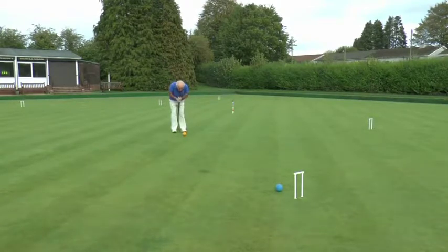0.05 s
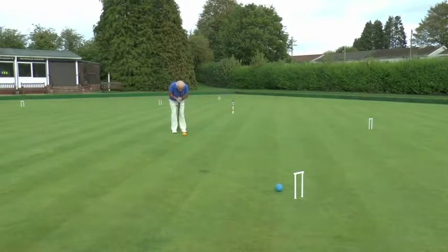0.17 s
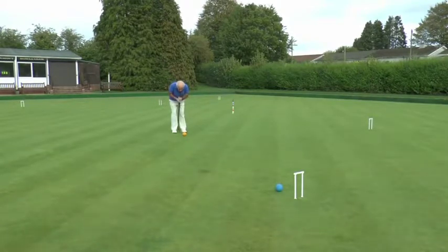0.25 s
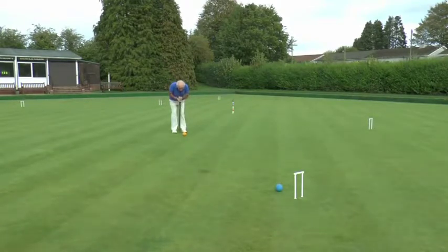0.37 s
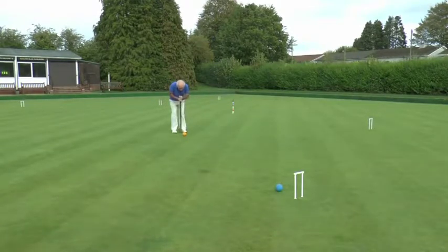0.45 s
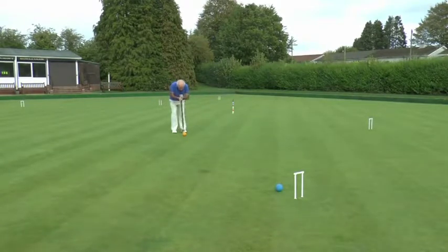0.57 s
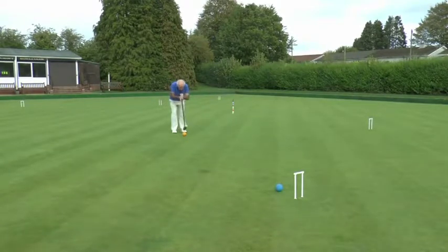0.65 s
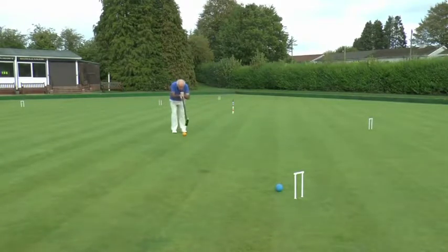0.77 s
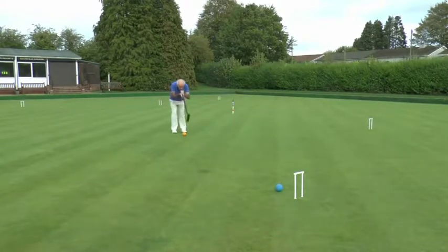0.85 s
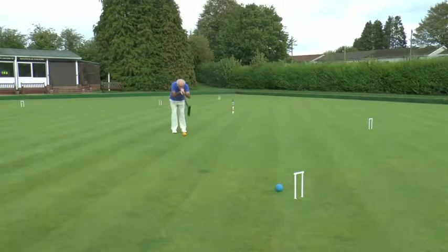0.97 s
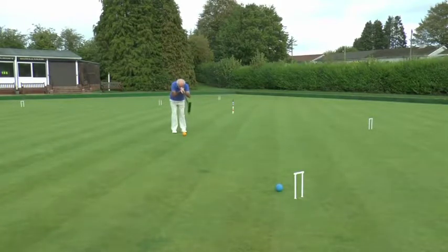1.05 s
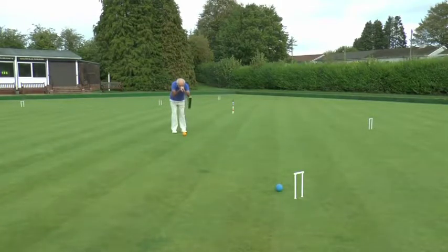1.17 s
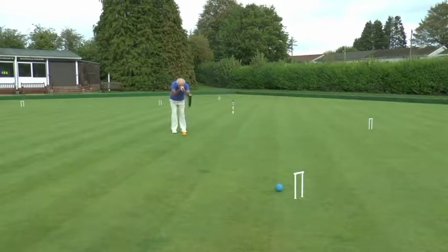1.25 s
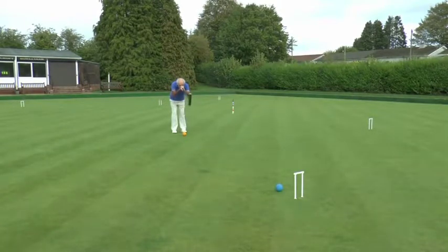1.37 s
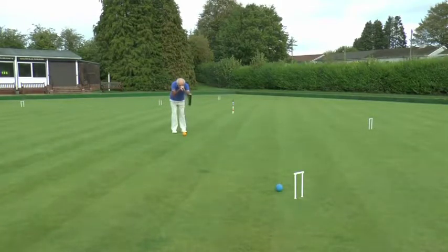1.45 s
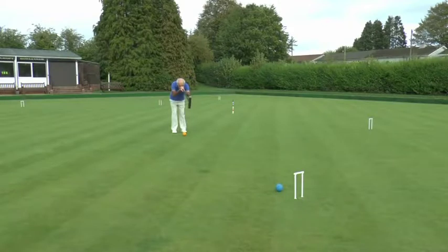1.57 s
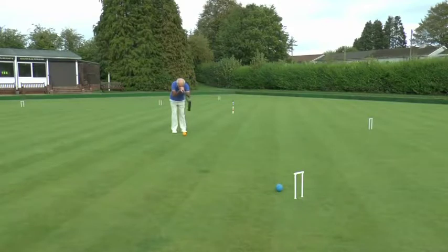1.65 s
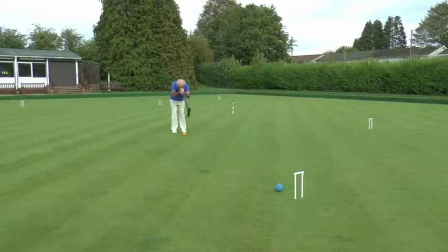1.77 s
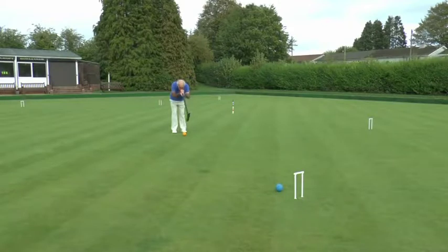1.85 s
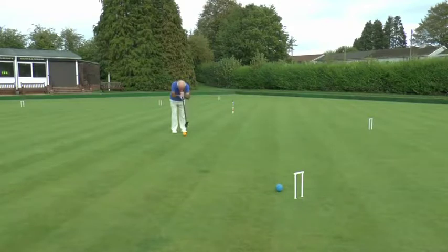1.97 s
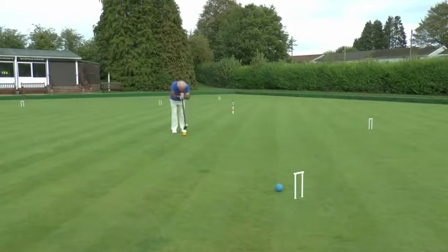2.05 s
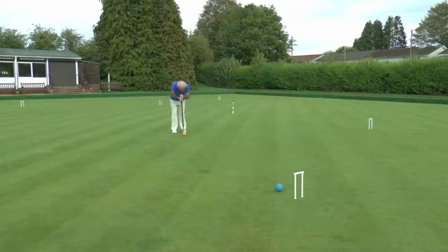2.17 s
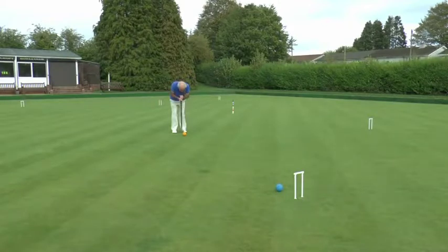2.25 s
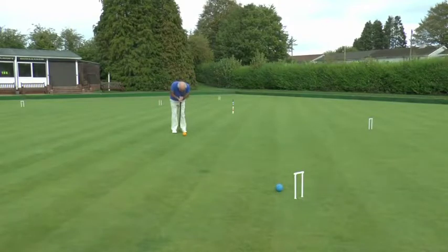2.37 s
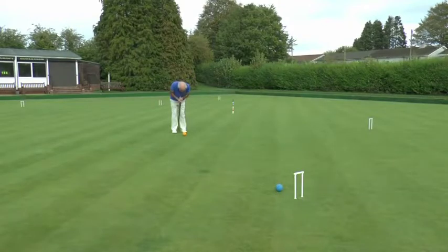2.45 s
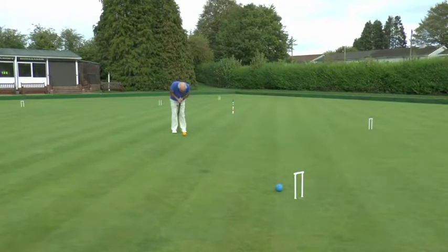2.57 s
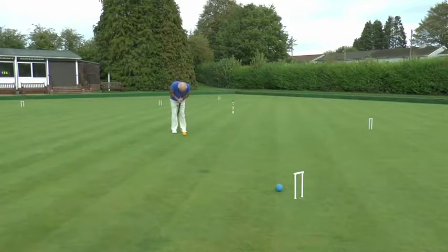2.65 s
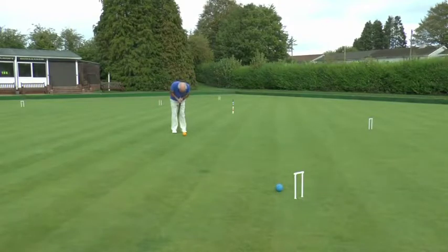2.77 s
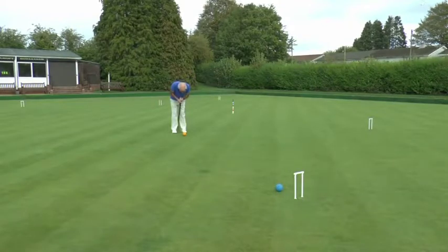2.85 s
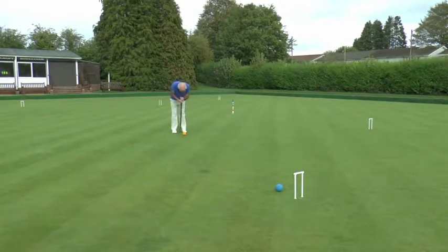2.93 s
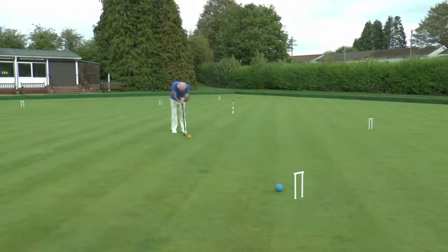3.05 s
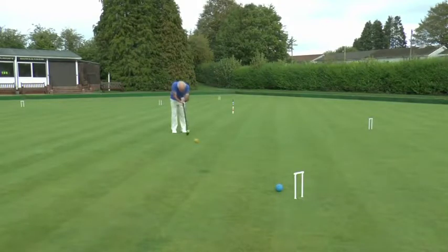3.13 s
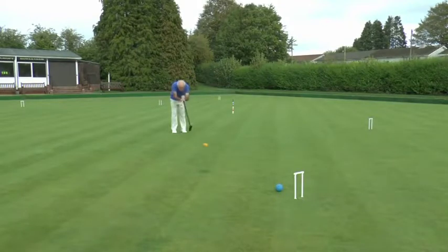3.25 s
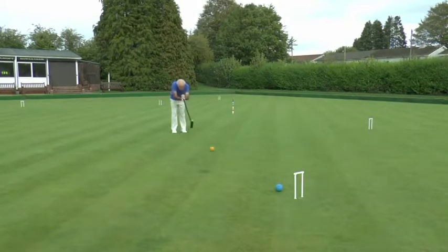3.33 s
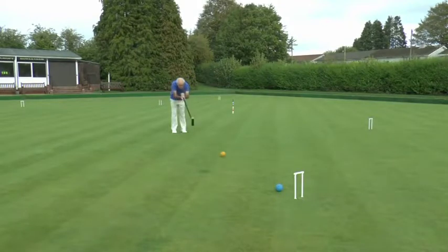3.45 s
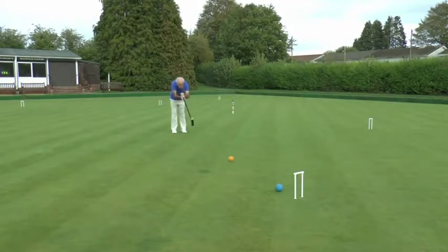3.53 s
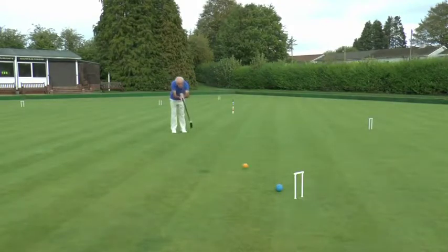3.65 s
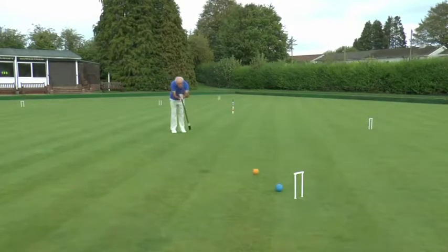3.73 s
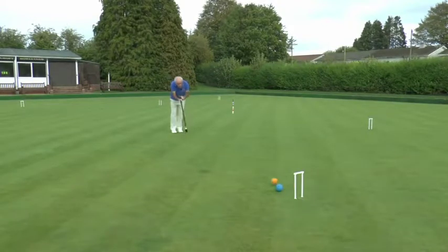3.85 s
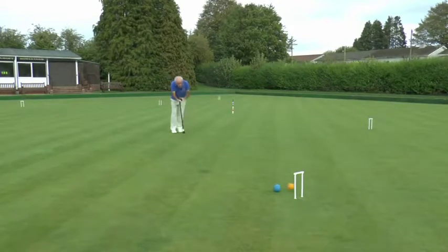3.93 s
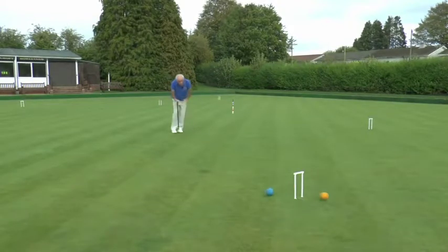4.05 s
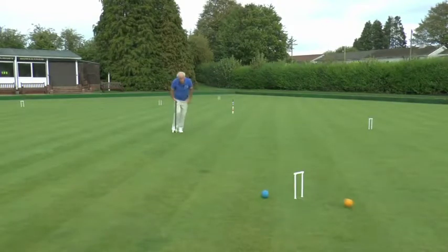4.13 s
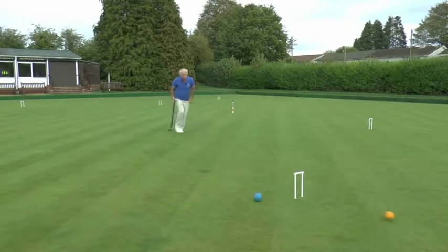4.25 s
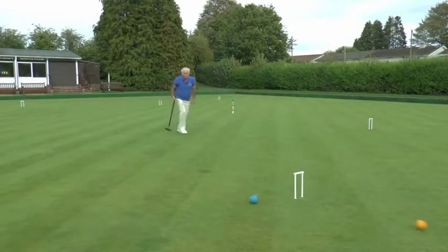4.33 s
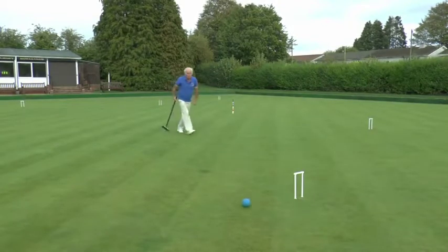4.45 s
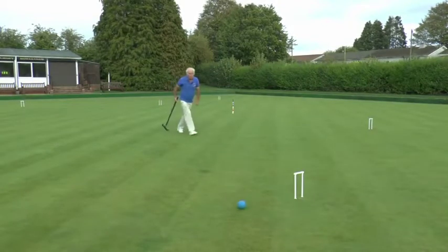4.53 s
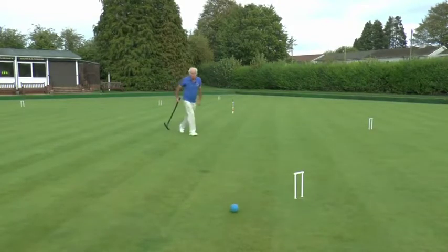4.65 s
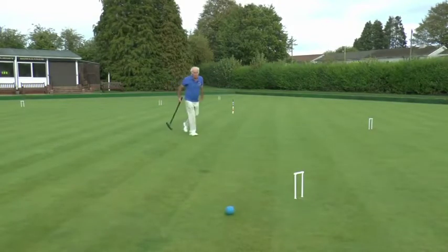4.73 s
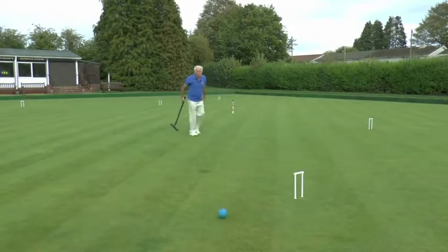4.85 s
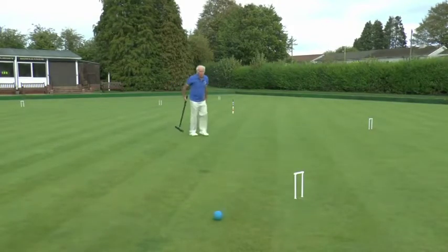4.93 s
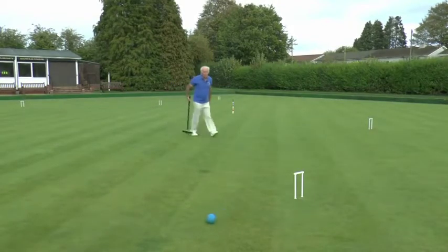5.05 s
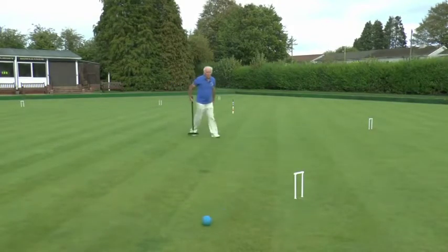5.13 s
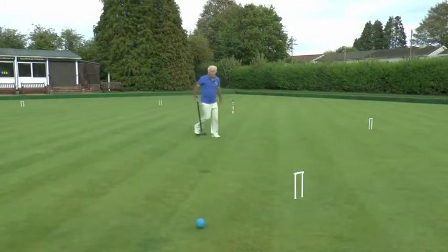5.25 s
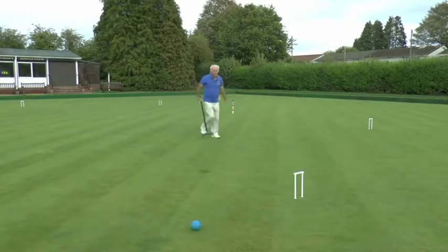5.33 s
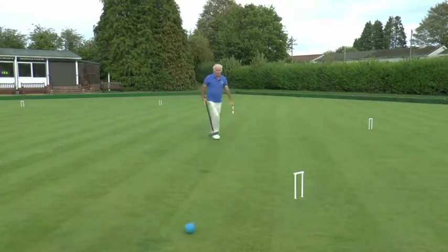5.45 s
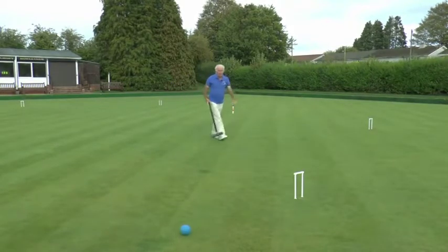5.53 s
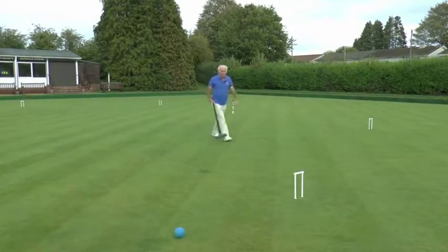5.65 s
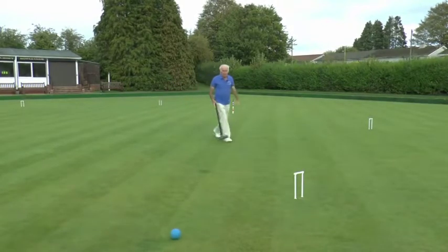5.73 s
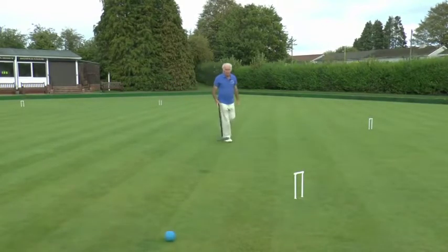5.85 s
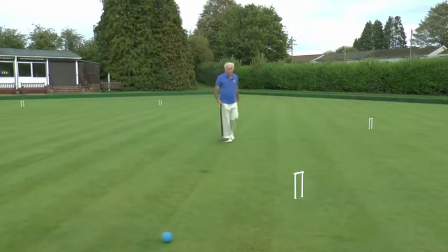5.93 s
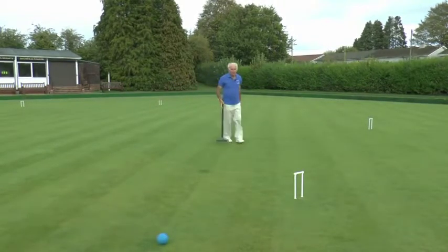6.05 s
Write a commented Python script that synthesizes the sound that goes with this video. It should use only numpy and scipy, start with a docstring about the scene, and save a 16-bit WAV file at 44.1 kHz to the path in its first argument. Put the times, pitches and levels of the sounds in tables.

```python
"""A wooden mallet clacks on a croquet ball on an open lawn: damped modes under a rough noise crack.
Hedges and a pavilion return faint echoes as smeared noise bands; the ball knocks a second ball, falling in pitch.
Wind thumps the microphone ever harder as lumpy noise, over noise bands of far traffic and rustling trees.
Small ticks ring nearby; the signal crackles with spikes and grainy noise in the gusts and drops out once."""
import sys
import numpy as np
from scipy import signal
from scipy.fft import rfft, irfft
from scipy.io import wavfile
from scipy.ndimage import uniform_filter1d

SR = 44100
rng = np.random.default_rng(int(sys.argv[2]) if len(sys.argv) > 2 else 0)


def bounce(signal):
    """Save signal as a 16-bit WAV file at the path given by the first command-line argument."""
    frames = np.transpose(np.atleast_2d(signal))
    limited = np.clip(frames, -1, 1)
    pcm = np.round(limited * 32767).astype(np.int16)
    wavfile.write(sys.argv[1], SR, pcm)


N = 268965
T = np.arange(N) / SR

# surroundings: (time [s], leaves level [dB], traffic level [dB])
RUSTLE = [(0.0, -65.5, -58.5), (0.32, -69, -59), (0.78, -67.5, -58), (1.54, -70, -58.5), (2.63, -64, -57.5),
          (3.11, -64.5, -58), (3.24, -67, -57.5), (3.6, -68, -59), (4.14, -67, -57.5), (4.67, -69.5, -58),
          (5.25, -70, -59.5), (5.74, -70, -59.5), (5.89, -71.5, -61.5), (6.1, -70, -60)]
# noise spectra, relative: (frequency [Hz], density [dB per Hz])
TRAFFIC_SPECTRUM = [(20, 4), (40, 4), (80, -15.5), (150, 3), (300, -2.5), (500, -1), (760, 0), (1050, -2),
                    (1400, -10.5), (2000, -18), (3000, -46), (5000, -57)]
LEAVES_SPECTRUM = [(900, -31.5), (1500, -1.5), (2400, 0), (3300, -2), (4200, -3.5), (5200, -7),
                   (6500, -13.5), (8000, -29.5), (11000, -53)]
HISS_SPECTRUM = [(3000, -27), (5000, 0), (7000, 1), (9500, -1), (11100, -2), (11600, -19), (12000, -71)]
SIDE_HISS_SPECTRUM = [(200, 2), (500, -7.5), (1200, -7.5), (2200, -3), (5000, -3), (11100, -5),
                      (11600, -42), (12000, -70)]
SIDE_HISS_DB = -81.5
HISS_DB, HISS_FOLLOWS = -74.5, 0.8  # mean level; share of the leaves' dB changes
# fuzzy whistles and noise bands: (start [s], end [s], from [Hz], to [Hz], width [Hz], level [dB])
WHISTLES = [(2.334, 3.2, 4000, 4400, 440, -74.5), (3.749, 3.906, 4800, 4800, 1500, -69.5),
            (4.166, 4.32, 1690, 1370, 50, -74), (3.95, 5.88, 1300, 1480, 660, -70)]

# wind at the microphone: (time [s], slow eddies [dB], small fast eddies [dB])
WIND = [(0.0, -67.5, -77), (0.38, -69, -67), (0.46, -45.5, -59), (0.62, -59.5, -62), (0.72, -61.5, -65),
        (0.95, -54.5, -60), (1.3, -52, -56.5), (1.56, -62.5, -64.5), (1.64, -41, -53), (1.9, -46, -59),
        (2.12, -55.5, -64), (2.5, -45.5, -57.5), (3.28, -49.5, -59), (3.55, -36.5, -47), (3.73, -23, -36),
        (3.85, -36, -47), (4.03, -46, -62), (4.2, -36, -46.5), (4.35, -36.5, -48.5), (4.55, -32, -45.5),
        (4.7, -33.5, -37), (4.82, -26, -34), (4.99, -32.5, -41), (5.05, -27.5, -31.5), (5.25, -26, -37),
        (5.38, -20, -29), (5.49, -24, -31), (5.56, -24, -22.5), (5.72, -22, -24), (5.84, -25, -30),
        (5.92, -28.5, -26), (6.0, -26.5, -40.5), (6.1, -36, -48)]
# single strong thumps in the wind: (centre [s], level [dB])
THUMPS = [(0.428, -46), (0.499, -30), (0.558, -29), (0.784, -31), (0.819, -40), (0.906, -41), (1.128, -48),
          (1.364, -43), (1.509, -50.5), (1.811, -39.5), (2.187, -35), (2.464, -38), (2.6, -45),
          (2.807, -42), (2.939, -39.5), (3.062, -33), (3.178, -36), (3.226, -39.5), (3.343, -35.5),
          (3.425, -30), (3.575, -27.5), (3.63, -22.5), (3.67, -22.5), (3.877, -28.5), (3.924, -34.5),
          (4.127, -29), (4.186, -24.5), (4.45, -24.5), (4.503, -25), (4.573, -21.5), (4.795, -21),
          (4.965, -30.5), (5.655, -17.5), (5.705, -16), (5.819, -19)]
THUMP_HALF_WIDTH_S, THUMP_FAST_DB = 0.01, -16  # small eddies relative to the thump
# wind spectra, relative; the roar is for the strongest gusts: (frequency [Hz], density [dB per Hz])
SLOW_SPECTRUM = [(10, -3.5), (25, 1), (60, 1), (90, -9.5), (130, -40), (200, -87)]
FAST_SPECTRUM = [(50, -11.5), (90, 2), (150, -7), (230, -17), (330, -26), (600, -50.5), (1000, -76),
                 (2000, -77)]
ROAR_SPECTRUM = [(150, -16), (280, 6.5), (400, -4.5), (600, -9), (850, -20.5), (1300, -55)]

# spikes before shaping by the crackle tone: (time [s], level [dB], sign)
SPIKES = [(4.693, -34, -1), (4.698, -21, 1), (4.708, -41, 1), (4.709, -19.5, 1), (4.7742, -24, 1),
          (5.679, -27.5, -1), (5.702, -26, 1), (5.924, -26.5, 1)]
# grainy patches before shaping; a row that ends before it starts is silent: (start [s], end [s], level [dB])
CRACKLE = [(4.659, 4.701, -59), (4.684, 4.712, -54), (4.711, 4.7102, -46), (4.766, 4.807, -61.5),
           (4.964, 5.046, -66), (5.24, 5.29, -65), (5.664, 5.716, -55), (5.682, 5.689, -41.5),
           (5.888, 5.946, -61.5)]
# crackle tone: (frequency [Hz], gain [dB])
CRACKLE_TONE = [(300, -1), (1000, 2.5), (3000, -1), (6000, -7), (11500, -9.5), (12800, -16), (13500, -46)]
DROPOUT_START_S, DROPOUT_END_S, DROPOUT_DB = 4.7105, 4.7735, -28
RESIDUE_DB, RESIDUE_PER_S = -83, 300  # faint ticks left inside the dropout
EDGE_HZ = 14000
# side signal of ticks and crackle: (frequency [Hz], gain [dB])
SIDE_GAIN = [(20, -50), (150, -38), (700, -17), (2000, -15), (4000, -14), (8000, -14), (14500, -9)]

# small ticks: (time [s], level [dB], ring [Hz])
TICKS = [(0.101, -49.5, 6950), (.134, -50, 7500), (.14, -51, 7500), (0.217, -44, 1700), (.832, -49, 11900),
         (.903, -54, 5500), (.931, -50, 8100), (.989, -54, 12100), (.997, -56, 7500), (1.851, -35, 5570),
         (4.226, -56, 6000)]
# fuller taps: (time [s], modes (frequency [Hz], level [dB], t60 [s]))
TAPS = [(0.8958, [(340, -45.5, 0.037), (4000, -47, 0.0043), (5600, -46, 0.0071)]),
        (4.1612, [(1620, -43.5, .012), (2100, -55, .008), (2520, -42.5, 0.0072), (7900, -55, .011)])]
# snap of the ticks: (frequency [Hz], density [dB per Hz])
SNAP_SPECTRUM = [(2000, -20), (4000, -3), (7000, 4), (10500, -2), (11500, -6), (13000, -30)]
TICK_T60_S = 0.0072
SNAP_LOW, SNAP_HIGH, SNAP_SPLIT_HZ = 0.077, 0.44, 6500  # snap share for rings below and above the split

# echoes of the clack: (delay after the blow [s], level [dB], time to swell to full [s], centre [Hz])
ECHOES = [(0.049, -57, 0.0037, 2100), (.048, -54, 0.008, 4230), (.096, -48.5, .0022, 720),
          (0.088, -55.5, 0.012, 3970), (.112, -58, 0.014, 1900), (.14, -59.5, .016, 4150),
          (0.216, -61, .005, 4470), (.453, -61, 0.0027, 2600)]
# tone of the echoes, dull above 11 kHz: (frequency [Hz], gain [dB])
ECHO_TONE = [(100, 2.5), (5000, -2), (9000, -3.5), (11500, -12), (12500, -42)]
ECHO_SPREAD = 1  # width as a share of the centre
ECHO_TAIL_DB, ECHO_TAIL_FULL_S = -66.5, 0.11

BALL_S, BALL_DB = 3.9605, -25
BALL_START_HZ, BALL_END_HZ = 1700, 677

BLOW_S = 3.0236
# mallet head and ball: (frequency [Hz], level [dB], time to swell to full [s])
MALLET_MODES = [(170, -25, 0.0033), (260, -23, 0.0034), (398, -18.5, 0.0031), (507, -22, 0.0032),
                (692, -36.5, 0.00196), (874, -17, 0.0035), (1010, -24, 0.0033), (1165, -26.5, 0.0046),
                (1672, -20, 0.0036), (1886, -11.5, 0.002), (2250, -28.5, 0.0036), (2570, -16, 0.0031),
                (2980, -29, 0.0036)]
# rough treble of the blow, relative: (frequency [Hz], density [dB per Hz])
CRACK_SPECTRUM = [(2000, -25), (3000, -5), (4200, 6.5), (5400, -8), (6000, 4), (7200, -5), (7800, -18),
                  (8500, -7.5), (10300, -5.5), (11300, -18), (12000, -4), (12700, -21), (13300, -11),
                  (14200, -30)]


def gain_of(db):
    """Amplitude of a level in dB."""
    return 10 ** (np.asarray(db) / 20)


def evened(x):
    """Scales to an rms of 1."""
    return x / np.sqrt(np.mean(x ** 2) + 1e-20)


def read(points, hz):
    """Reads a dB curve along log frequency; -150 dB outside it."""
    f, value = np.transpose(points)
    return np.interp(np.log(hz + 1), np.log(f + 1), value, left=-150, right=-150)


def columns(table):
    """Interpolates every column after the time over the whole scene."""
    s, *values = np.transpose(table)
    return [np.interp(T, s, v) for v in values]


def add(mix, start_s, sound):
    """Adds a sound into the mix in place."""
    part = mix[round(start_s * SR):][:len(sound)]
    part += sound[:len(part)]


def coloured(x, spectrum):
    """Shapes a signal by a spectrum in dB."""
    hz = np.fft.rfftfreq(len(x), 1 / SR)
    return irfft(rfft(x) * gain_of(read(spectrum, hz)), len(x))


def patchy(spectrum, patchy_db):
    """Noise whose short-time spectrum drifts in patches."""
    hz = np.fft.rfftfreq(512, 1 / SR)
    real, imag, patches = rng.standard_normal((N // 128 + 5, 257, 3)).T
    patches = uniform_filter1d(patches, size=8, axis=0)
    patches = evened(uniform_filter1d(patches, size=24, axis=1))
    level_db = read(spectrum, hz)[:, None] + patchy_db * patches
    z = (real + 1j * imag) * gain_of(level_db)
    return evened(signal.istft(z, nperseg=512, noverlap=384)[1][:N])


def swell(count, full_s, steep):
    """Envelope that rises to 1 at full_s and dies away."""
    u = T[:count] / full_s
    return (u * np.exp(1 - u)) ** steep


def band(count, hz, width_hz):
    """Noise in a steep two-pole resonance that follows the curve hz."""
    turn = np.exp(2j * np.pi * np.cumsum(hz * np.ones(count)) / SR)
    r = np.exp(-np.pi * width_hz / SR)
    poles = np.convolve([1, -r], [1, -r])
    slow = signal.lfilter([1], poles, rng.standard_normal(count) / turn)
    return evened((turn * slow).real)


def wide(mid, side):
    """Left and right as the mid plus and minus a shaped side."""
    side = coloured(side, SIDE_GAIN)
    return np.array([mid + side, mid - side])


def surroundings():
    """Far traffic, leaves, fine hiss and whistles in the centre; steady faint hiss opposite in the channels."""
    leaves_db, traffic_db = columns(RUSTLE)
    hiss_db = HISS_DB + HISS_FOLLOWS * (leaves_db - leaves_db.mean())
    mid = gain_of(traffic_db) * patchy(TRAFFIC_SPECTRUM, patchy_db=0.56)
    mid += gain_of(leaves_db) * patchy(LEAVES_SPECTRUM, patchy_db=1.0)
    mid += gain_of(hiss_db) * patchy(HISS_SPECTRUM, patchy_db=0.2)
    for start, end, from_hz, to_hz, width_hz, db in WHISTLES:
        count = round((end - start) * SR)
        glide_hz = np.linspace(from_hz, to_hz, count)
        fade = signal.windows.tukey(count, 0.5)
        add(mid, start, gain_of(db) * band(count, glide_hz, width_hz) * fade)
    side = gain_of(SIDE_HISS_DB) * patchy(SIDE_HISS_SPECTRUM, patchy_db=1.5)
    return np.array([mid + side, mid - side])


def wind():
    """Eddies press on the capsule in lumps: pushes are taller and narrower than pulls."""
    slow_db, fast_db = columns(WIND)
    thumps = sum(gain_of(2 * db) * np.exp(-((T - s) / THUMP_HALF_WIDTH_S) ** 2) for s, db in THUMPS)
    slow_power = gain_of(2 * slow_db) + thumps
    fast_power = gain_of(2 * fast_db) + gain_of(2 * THUMP_FAST_DB) * thumps
    slow, fast, roar = (evened(coloured(rng.standard_normal(N), spectrum))
                        for spectrum in (SLOW_SPECTRUM, FAST_SPECTRUM, ROAR_SPECTRUM))
    size = np.sqrt(slow_power + fast_power)
    eddies = (np.sqrt(slow_power) * slow + np.sqrt(fast_power) * fast) / size
    lumps = np.exp(0.29 * eddies)  # skews pushes against pulls
    lumps = signal.sosfilt(signal.butter(2, 14, "high", fs=SR, output="sos"), lumps - lumps.mean())
    # chance swells are partly evened: the gusts set the level
    lumps = lumps / (abs(uniform_filter1d(lumps ** 2, size=4000)) + 1e-9) ** 0.22
    gust_db = uniform_filter1d(fast_db, size=5000)
    breeze = gain_of(-66) * slow[::-1]  # a faint flutter never stops
    # the roar grows faster than the gust
    return breeze + size * evened(lumps) + gain_of(7.0 + 2.27 * gust_db) * roar


def crackle():
    """Spikes one sample wide and short patches of grainy noise, shaped by one tone."""
    out = np.zeros(N)
    grain = rng.standard_normal(N) * gain_of(3.1 * rng.exponential(1, N))
    for s, db, sign in SPIKES:
        add(out, s, gain_of(db) * np.sign(sign) * np.ones(1))
    for start, end, db in CRACKLE:
        part = grain[round(start * SR):round(end * SR)]
        add(out, start, gain_of(db) * evened(part) * signal.windows.tukey(len(part), 0.4))
    return gain_of(4.0) * coloured(out, CRACKLE_TONE)


def ticks():
    """Each tick is a snap of noise and one short ring; a tap rings in a few modes."""
    out, t = np.zeros(N), T[:2000]
    for s, db, hz in TICKS:
        share = SNAP_HIGH if hz > SNAP_SPLIT_HZ else SNAP_LOW
        snap = evened(coloured(rng.standard_normal(2000), SNAP_SPECTRUM))
        ring = np.sin(2 * np.pi * hz * t)
        add(out, s, gain_of(db - 60 * t / TICK_T60_S) * ((1 - share) * ring + share * snap))
    for s, modes in TAPS:
        for hz, db, t60_s in modes:
            add(out, s, gain_of(db - 60 * t / t60_s) * np.sin(2 * np.pi * hz * t))
    return out


def echoes():
    """Smeared returns of the clack from hedges and walls, over a diffuse tail."""
    out = np.zeros(N)
    for delay_s, db, full_s, hz in ECHOES:
        smear = band(4000, hz, ECHO_SPREAD * hz) * swell(4000, full_s, steep=1.33)
        add(out, BLOW_S + delay_s, gain_of(db) * smear)
    tail = band(SR, 3700, 4000) * swell(SR, ECHO_TAIL_FULL_S, steep=1.8)
    add(out, BLOW_S, gain_of(ECHO_TAIL_DB) * tail)
    grain = evened(uniform_filter1d(rng.standard_normal(N), size=200))  # leaves scatter unevenly
    return coloured(out * gain_of(1.5 * grain), ECHO_TONE)


def balls():
    """A short knock of ball on ball, falling in pitch, with a tick at first touch."""
    out, t = np.zeros(N), T[:600]
    pitch_hz = BALL_END_HZ + (BALL_START_HZ - BALL_END_HZ) * np.exp(-t / 0.0005)
    turns = np.cumsum(pitch_hz) / SR
    knock = -np.sin(2 * np.pi * turns) * swell(600, 0.00065, steep=2.0)
    partials = [(5400, 1), (2600, 0.66), (4000, 0.6), (7700, 0.34)]  # (frequency [Hz], amplitude)
    tick = sum(amp * np.sin(2 * np.pi * hz * t) for hz, amp in partials)
    tick = tick * swell(600, 0.00032, steep=1.4)
    add(out, BALL_S, gain_of(BALL_DB) * (knock + gain_of(-21) * tick))
    return out


def mallet():
    """Modes swell as face and ball touch and are damped at once; a crack on top; a short noise tail follows."""
    out, side_noise, t = np.zeros(N), np.zeros(N), T[:2000]
    for k, (hz, db, full_s) in enumerate(MALLET_MODES):
        sign = (-1) ** k  # neighbour modes start in opposite senses
        mode = swell(2000, full_s, steep=2.74) * np.sin(2 * np.pi * hz * t)
        add(out, BLOW_S, sign * gain_of(db) * mode)
    crack = coloured(rng.standard_normal(2000) * swell(2000, 0.0027, steep=2.2), CRACK_SPECTRUM)
    add(out, BLOW_S, gain_of(-18.0) * crack / abs(crack).max())
    add(out, BLOW_S, gain_of(-45) * band(2000, 3500, 8000) * swell(2000, 0.012, steep=2.2))
    # a noise burst opposite in the two channels
    add(side_noise, BLOW_S, gain_of(-36.0) * band(2000, 2600, 1440) * swell(2000, 0.0038, steep=2.44))
    add(side_noise, BLOW_S, gain_of(-43.5) * band(2000, 3500, 9000) * swell(2000, 0.011, steep=2.18))
    return np.array([out + side_noise, out - side_noise])


def scene():
    """Sums all the sources in stereo."""
    small = wide(ticks(), gain_of(-7) * ticks())
    return surroundings() + wind() + small + echoes() + balls() + mallet()


def record(dry):
    """Rounds peaks, adds crackle, cuts out once while settling to rest, then limits the band."""
    dry = 0.6 * np.tanh(dry / 0.6)  # the input stage rounds off the peaks
    out = dry + wide(crackle(), crackle())
    a, b = round(DROPOUT_START_S * SR), round(DROPOUT_END_S * SR)
    spiky = rng.random(b - a) < RESIDUE_PER_S / SR
    residue = rng.standard_normal(b - a) * (0.08 + spiky)
    residue = gain_of(RESIDUE_DB) * evened(coloured(residue, CRACKLE_TONE))
    settle = out[:, a:a + 1] * np.exp(-T[:b - a] / 0.0034)
    rest = signal.sosfilt(signal.butter(2, 150, fs=SR, output="sos"), out[:, a:b])  # low-pass
    out[:, a:b] = settle + gain_of(DROPOUT_DB) * rest + residue
    out[:, b:] *= 1 - 0.75 * np.exp(-T[:N - b] / 0.0025)  # comes back with a small step, then swells
    low_pass = signal.firwin(511, EDGE_HZ, window=("kaiser", 9), fs=SR)
    return signal.oaconvolve(out, low_pass[None], "same")


dry = scene()
out = record(dry)
bounce(out)
```